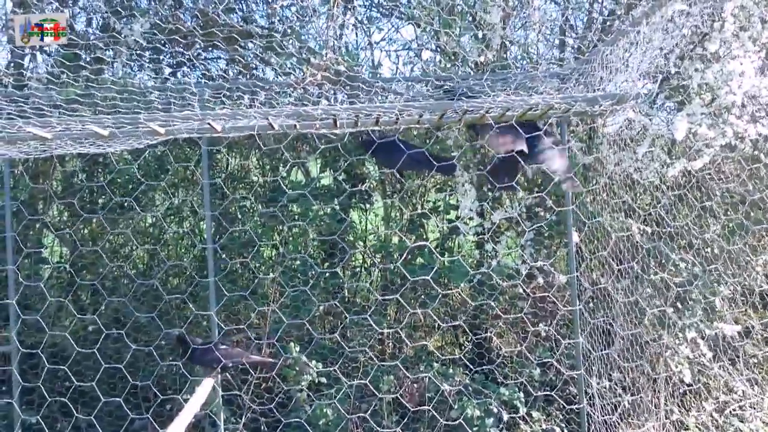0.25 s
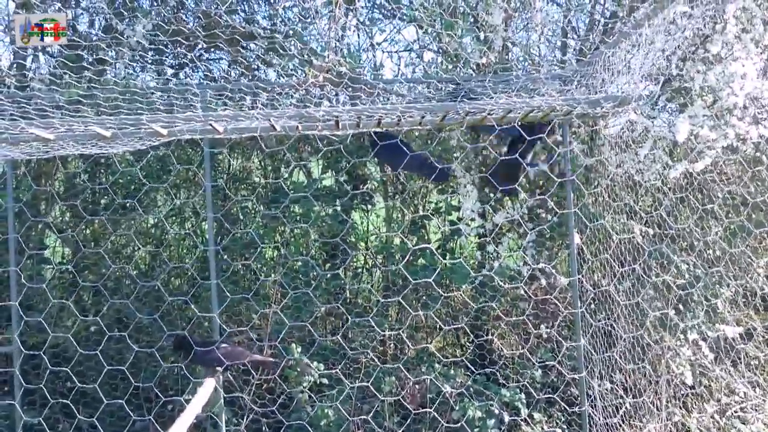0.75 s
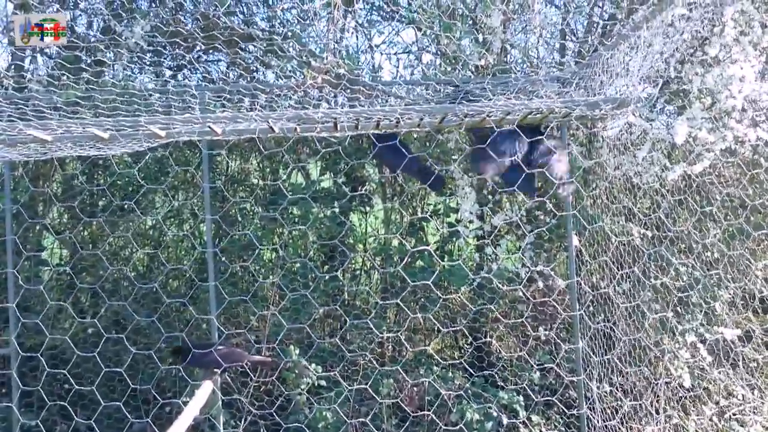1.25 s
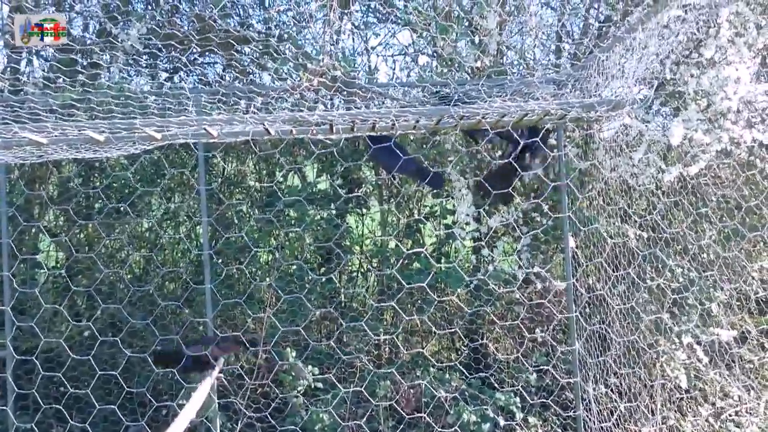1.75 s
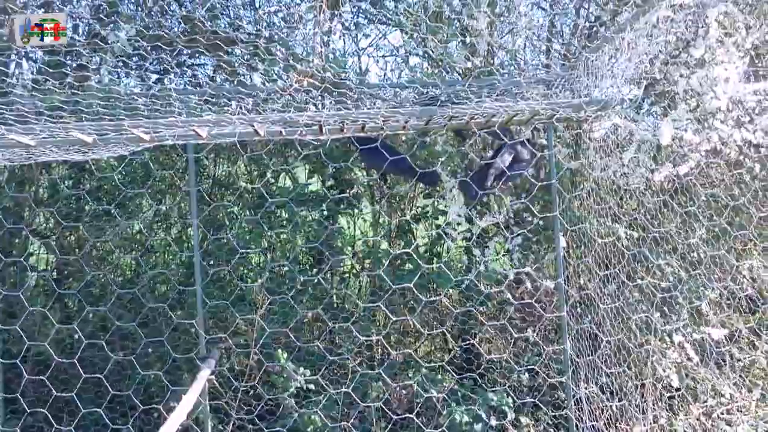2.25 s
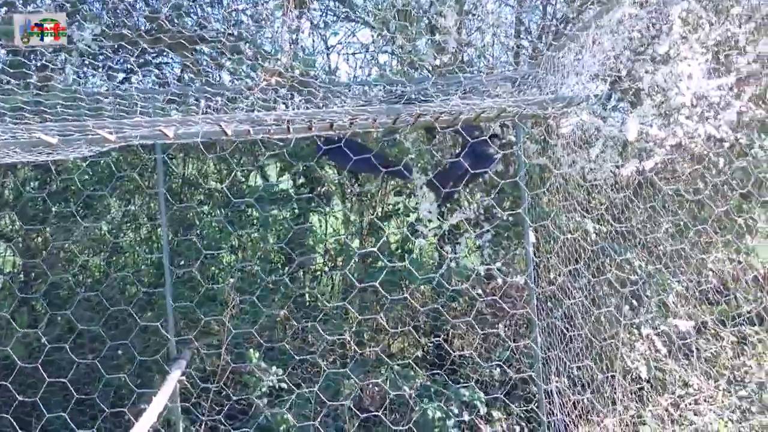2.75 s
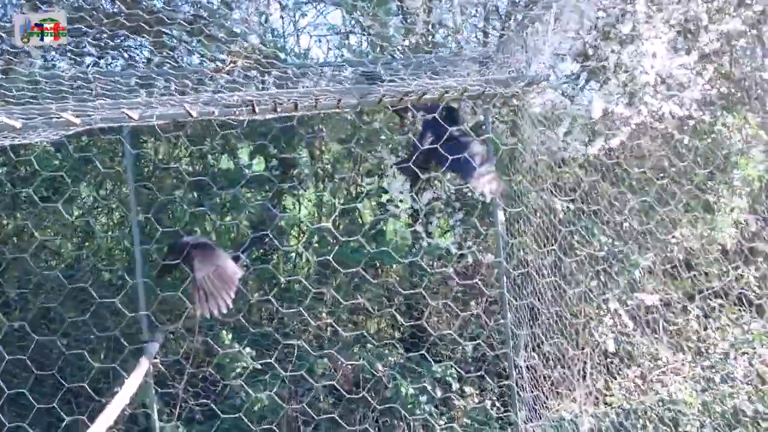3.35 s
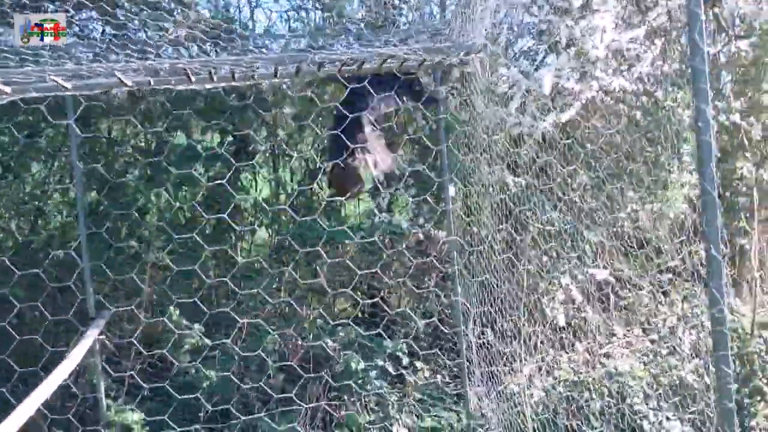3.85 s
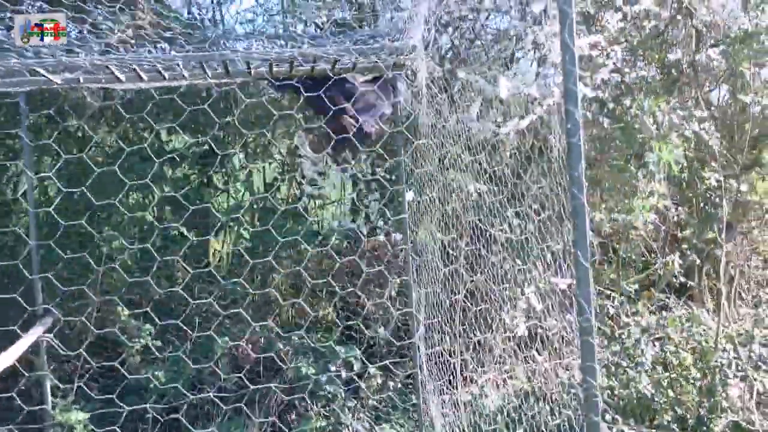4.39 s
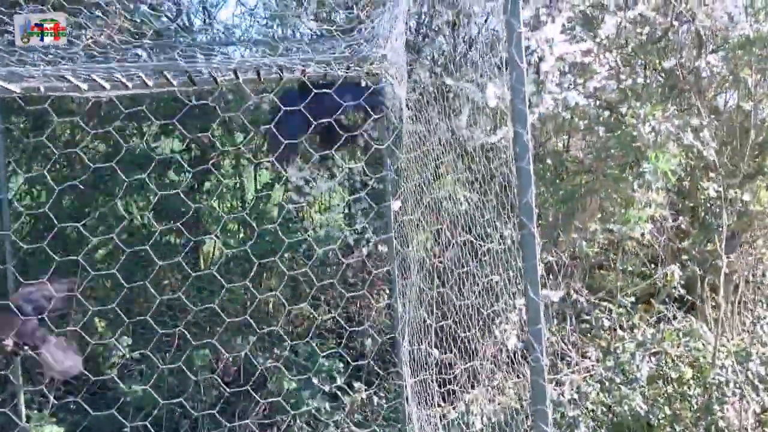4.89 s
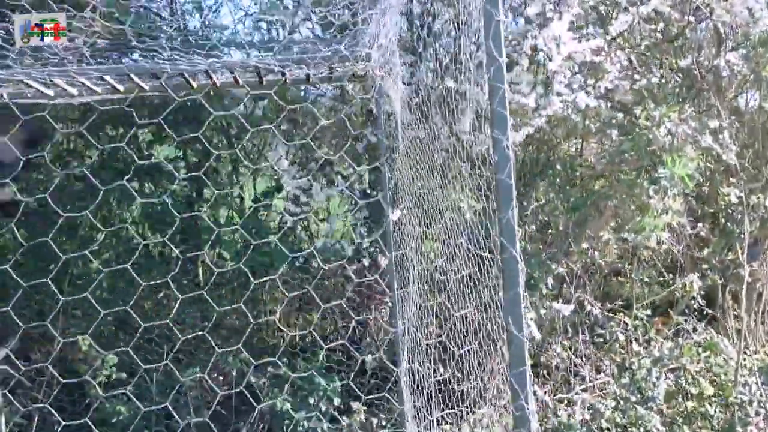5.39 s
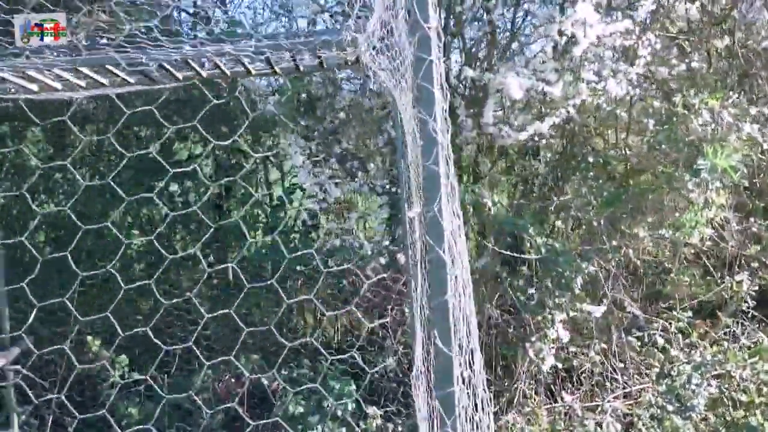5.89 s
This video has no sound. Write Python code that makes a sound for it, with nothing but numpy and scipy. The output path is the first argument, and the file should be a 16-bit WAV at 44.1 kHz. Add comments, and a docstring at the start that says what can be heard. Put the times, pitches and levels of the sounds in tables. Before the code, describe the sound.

Crows flap against a wire mesh cage, wings swishing and wire rattling, growing louder as dry undergrowth crackles outdoors.

```python
"""Crows in a wire-mesh trap

Crows flutter against the netting beside a hedge, far off at first, then louder. Wings swish and slap
the mesh, claws tick and scrape on the wire, and dry undergrowth crackles in the second half.
Light wind puffs on a hand-held recorder whose two microphone ports each have their own colour."""
import sys
import numpy as np
from scipy import signal
from scipy.fft import rfft, irfft
from scipy.io import wavfile
from scipy.ndimage import uniform_filter1d

SR = 44100
rng = np.random.default_rng(int(sys.argv[2]) if len(sys.argv) > 2 else 0)


def pcm_store(signal):
    """Save signal as 16-bit PCM."""
    levels = np.round(np.clip(np.atleast_2d(signal), -1, 1) * 32767)
    wavfile.write(sys.argv[1], SR, levels.astype(np.int16).T)


N = 270333
T = np.arange(N) / SR
PORT_LAG_S = .00043   # travel time of sound from one port to the other
USUAL_T60_S = 0.022   # decay of a typical rattle of the mesh

# bright EQ of feathers and chattering wire: f/Hz, level/dB
BRIGHT_EQ = [(300, -26.5), (1000, -16.5), (2000, -3.5), (3200, -1.5), (6500, 0), (10000, -1), (15000, 1)]
# dull EQ of pushed air and body thuds: f/Hz, level/dB
DULL_EQ = [(40, -8), (120, -15.5), (200, -9), (320, -2), (500, -6.5), (800, 6), (1200, 4), (2000, -2.5),
           (3500, -15), (9000, -52.5)]


def wings(usual_hiss_db=-36, air_offset_db=-10.5, air_db_per_db=0.92):
    """Each stroke pushes air and drags stiff feathers over one another and over the mesh."""
    # wing strokes and their feather hiss: t/s, length/s, level/dB
    strokes = [(-.03, 0.045, -45.5), (0.147, 0.053, -48.5), (0.343, 0.055, -48), (0.575, 0.024, -53),
               (.748, 0.056, -50.5), (0.913, 0.079, -44.5), (1.103, 0.067, -45), (1.246, 0.074, -50),
               (1.294, 0.093, -44), (1.541, 0.059, -50.5), (1.7, .11, -53.5), (1.915, 0.13, -60),
               (1.976, 0.081, -49), (2.155, 0.093, -50), (3.397, 0.041, -53.5), (3.455, 0.054, -43),
               (3.619, 0.05, -38.5), (3.744, 0.069, -31), (3.935, 0.036, -36), (4.27, 0.071, -39),
               (4.444, 0.032, -35), (4.546, 0.092, -45.5), (4.694, 0.087, -30.5), (4.798, 0.027, -35.5),
               (4.865, 0.048, -36), (4.944, 0.04, -40.5), (5.099, 0.062, -44.5), (5.286, 0.046, -34.5),
               (5.398, 0.055, -36.5), (5.521, 0.073, -38.5), (5.716, .12, -41.5), (5.928, 0.014, -47),
               (6.015, 0.067, -45)]
    hiss, air = np.zeros(N), np.zeros(N)
    for start, length, hiss_db in strokes:
        stroke = swell(start, length, fullness=0.66)
        hiss += from_db(hiss_db) * stroke
        air += from_db(usual_hiss_db + air_offset_db + air_db_per_db * (hiss_db - usual_hiss_db)) * stroke
    flutter = from_db(0.41 * drift(110))   # feathers flick past one by one
    feathers = hiss * rms_one(colour(grains(per_s=3500, spread_db=5.0, smooth=0.62), BRIGHT_EQ))
    push = air * rms_one(colour(grains(per_s=1900, spread_db=2.5, smooth=0.82), DULL_EQ))
    return surroundings(flutter * (feathers + push), scatter_db=6, t60=0.059)


def mesh_strikes(crack_db=11.5, thud_db=-6, thud_db_per_doubling=8.5):
    """A blow cracks, then the loose wire twists chatter briefly over a dull thud."""
    # wings and feet hitting the mesh: t/s, level/dB, rattle t60/s
    blows = [(.077, -54, 0.023), (.157, -51, 0.018), (.471, -51.5, 0.038), (.757, -48, 0.016),
             (.9256, -40.5, 0.027), (1.053, -46.5, 0.031), (1.345, -41, 0.024), (1.371, -35, 0.019),
             (1.566, -47.5, 0.046), (1.793, -46.5, 0.035), (2.173, -45, 0.046), (2.221, -42.5, 0.033),
             (2.524, -46.5, 0.033), (2.629, -48.5, 0.037), (3.46, -50, 0.063), (3.483, -44, 0.0062),
             (3.603, -43, 0.067), (3.755, -26, 0.032), (3.765, -27.5, 0.019), (3.878, -47, 0.052),
             (3.95, -30, 0.012), (4.082, -33.5, 0.015), (4.177, -32, 0.018), (4.299, -32, 0.037),
             (4.398, -33.5, 0.022), (4.725, -24, 0.026), (4.754, -22.5, 0.019), (4.862, -33.5, 0.024),
             (4.947, -42, 0.028), (5.249, -36, 0.032), (5.2947, -16, 0.012), (5.3485, -28, .015),
             (5.379, -23.5, 0.015), (5.383, -19.5, 0.0081), (5.488, -42.5, 0.04), (5.533, -37.5, 0.038),
             (5.607, -29, 0.029), (5.674, -33, 0.032), (5.72, -33, 0.027)]
    rattle, thud, cracks = np.zeros(N), np.zeros(N), np.zeros(N)
    for start, level_db, t60 in list(blows) + footholds():
        at = int(start * SR)
        age = T[:min(N - at, SR // 4)]
        decay = from_db(level_db - 60 * age / t60)
        # a claw gives a short bright hit, a body a longer, duller one
        weight = from_db(thud_db + thud_db_per_doubling * np.log2(t60 / USUAL_T60_S))
        rattle[at:at + len(age)] += decay
        thud[at:at + len(age)] += decay * weight
        cracks[at] = from_db(level_db + crack_db)
    wire = rattle * rms_one(colour(grains(per_s=5100, spread_db=0.5, smooth=0.42), BRIGHT_EQ))
    body = thud * rms_one(colour(grains(per_s=4400, spread_db=0.5, smooth=1.0), DULL_EQ))
    return surroundings(colour(cracks, BRIGHT_EQ) + wire + body, scatter_db=-2, t60=0.15)


def footholds(per_s=4, above_rustle_db=10, spread_db=3):
    """Feet touch the wire at random, louder when the scuffle is: rows of t/s, level/dB, t60/s."""
    times = T[rng.random(N) < per_s / SR]
    levels = rustle_db(times) + above_rustle_db + spread_db * rng.standard_normal(len(times))
    return [(start, db, USUAL_T60_S) for start, db in zip(times, levels)]


def knocks():
    """Single taps, each with one quickly damped resonance; the soft contact gives little above it."""
    # small close knocks: t/s, level/dB, f/Hz, t60/s, left over right/dB
    taps = [(.6485, -27, 7100, 0.00032, 12), (.649, -41.5, 1100, 0.0061, 7), (3.462, -49, 335, 0.026, -6),
            (3.603, -31, 990, 0.014, 3), (3.878, -39.5, 334, 0.0068, -10), (4.172, -41.5, 422, 0.029, -2),
            (4.21, -41.5, 1140, 0.021, -5), (4.728, -32, 925, 0.043, 1), (4.754, -31, 960, .025, -5),
            (5.02, -27, 1374, 0.037, -2), (5.0238, -30, 1700, 0.013, -3), (5.026, -35.5, 1100, 0.041, -3),
            (5.055, -32, 1170, 0.0088, -3), (5.07, -25, 2100, 0.0067, -7.5), (5.2945, -25, 1000, 0.017, 8),
            (5.113, -48.5, 310, 0.053, -4), (5.605, -35, 423, .04, 1)]
    out, click = np.zeros((2, N)), signal.unit_impulse(SR // 10)
    for start, level_db, hz, t60, pan_db in taps:
        at = int(start * SR)
        contact = signal.sosfilt(signal.butter(4, min(1.7 * hz, .4 * SR), fs=SR, output="sos"), click)
        out[:, at:at + len(contact)] += from_db(level_db) * pan(pan_db) * ring(contact, hz, t60)
    return np.array([out[0], np.roll(out[1], round(PORT_LAG_S * SR))])


def claws():
    """A claw sticks and slips along a wire, which answers with a thin rasping note."""
    # skids on the wire: t/s, length/s, level/dB, f/Hz
    skids = [(1.715, 0.026, -50, 5400), (1.739, 0.0057, -40, 5090), (1.75, 0.022, -66, 5200),
             (2.319, .02, -63.5, 8170), (3.158, .025, -56, 10600), (5.408, 0.018, -42.5, 6340),
             (5.773, 0.076, -46.5, 5400)]
    slips = grains(per_s=2500, spread_db=2, smooth=.5)
    rasp = sum(from_db(db) * swell(start, length) * rms_one(ring(slips, hz, t60=.007))
               for start, length, db, hz in skids)
    return surroundings(rasp, scatter_db=-4, t60=0.1)


def undergrowth(stems_db=-5.5, clump_db=2):
    """Dry leaves crackle in clumps while thicker stems crunch lower down."""
    # crisp EQ of the leaves: f/Hz, level/dB
    leaf_eq = [(300, -40), (1000, -2.5), (2000, -3.5), (3200, -1.5), (6500, 0.5), (10000, -3.5),
               (15000, -3.5)]
    # darker EQ of the stems: f/Hz, level/dB
    stem_eq = [(40, -3), (150, -10), (320, -6.5), (500, -4.5), (800, -1.5), (1200, -0.5), (2000, -3),
               (3500, -27), (9000, -24)]
    leaf_snaps = grains(per_s=4200, spread_db=1.5, smooth=0.97) * from_db(1.83 * drift(62))
    stem_snaps = grains(per_s=900, spread_db=3.5, smooth=0.87) * from_db(2.6 * drift(23))
    leaves = rms_one(colour(leaf_snaps, leaf_eq))
    stems = from_db(stems_db) * rms_one(colour(stem_snaps, stem_eq))
    level = from_db(rustle_db(T) + clump_db * drift(rate_hz=4))
    return surroundings(level * (leaves + stems), scatter_db=6.5, t60=0.084)


def rustle_db(times, loudest_db=-42, db_per_stir_db=1.41):
    """Level of the leaves at the given times; it follows how hard they are stirred."""
    # how hard the undergrowth is stirred: t/s, level/dB
    stir = [(0.0, -65), (0.77, -69.5), (1.3, -65.5), (3.0, -71.5), (3.21, -69.5), (3.46, -62),
            (3.58, -57.5), (3.86, -57.5), (4.23, -55), (4.66, -56.5), (4.83, -51), (4.93, -54),
            (5.09, -55.5), (5.24, -57), (5.48, -55.5), (5.62, -55), (5.84, -59.5), (6.13, -55.5)]
    stir_times, stir_db = np.transpose(stir)
    return loudest_db + db_per_stir_db * (np.interp(times, stir_times, stir_db) - stir_db.max())


def wind(breeze_db=-68, gust_db=2.5):
    """Eddies buffet each port on its own, mostly the right; a puff is a few slow swings of pressure."""
    # puffs above the breeze: t/s, length/s, level/dB
    puff_cues = [(.152, .07, -61), (0.512, 0.12, -51.5), (1.39, .1, -52.5), (1.87, 0.072, -49.5),
                 (2.128, 0.025, -52), (2.443, 0.04, -54), (2.604, 0.05, -57), (2.901, .038, -47),
                 (3.868, 0.033, -47.5), (4.935, 0.13, -52.5), (5.301, 0.055, -55)]
    # low rumble of the eddies: f/Hz, level/dB
    rumble_eq = [(20, -39), (40, -5.5), (62, 2), (90, -3.5), (130, -13), (220, -27), (600, -62)]
    breeze = from_db(breeze_db + gust_db * drift(rate_hz=9.9))
    puffs = sum(from_db(db) * swell(start, length, fullness=1.8) for start, length, db in puff_cues)
    eddies = colour(rng.standard_normal((2, N)), rumble_eq)
    eddies /= np.sqrt(uniform_filter1d(eddies ** 2, size=1200, axis=1) + 1e-20)   # even out the level
    return (breeze + puffs) * eddies * from_db([[-15], [-1]])


def open_country(level_db=-61.5, pan_db=7, directions=8):
    """The hush of open country arrives from all directions, stronger on the left."""
    # EQ of the ambience bed: f/Hz, level/dB
    hush_eq = [(30, -8), (80, 2), (250, 3.5), (600, 8.5), (1000, 7.5), (2000, 1), (4000, -5), (7000, -10.5),
               (10000, -22.5), (15000, -3)]
    left, right = np.zeros(N), np.zeros(N)
    for lag in np.linspace(-1, 1, directions) * PORT_LAG_S:
        far = rng.standard_normal(N)
        left += far
        right += np.roll(far, round(lag * SR))
    return from_db(level_db) * pan(pan_db) * rms_one(colour(np.array([left, right]), hush_eq))


def surroundings(x, scatter_db, t60, count=90, size=1024):
    """Direct sound reaches the left port first; ground and hedge scatter echoes from all sides."""
    # where the birds lie as the recorder swings right: t/s, bearing (0 = ahead, 1 = hard left)
    bearing = [(0, 0.054), (3.2, 0.17), (3.9, 0.62), (4.7, 0.98), (5.4, 1.05), (6.13, 0.97)]
    # each scrap of sound comes from a spot of its own, so the echo pattern keeps changing
    span, starts = 3 * size, np.arange(0, N + size, size // 2)
    scraps = np.pad(x, (size, 2 * size))[starts[:, None] + np.arange(size)] * signal.windows.cosine(size)
    shape = (len(starts), count)
    delay = .0008 + .04 * rng.random(shape) ** 2
    gains = from_db(-40 * delay / t60) * rng.choice([-1, 1], shape)
    gains /= np.linalg.norm(gains, axis=1, keepdims=True)
    lag = rng.uniform(-.6, 1, shape) * PORT_LAG_S
    patterns = np.zeros((2, len(starts), span), np.float32)
    for port, arrival in enumerate((delay, delay + lag)):
        np.add.at(patterns[port], (np.arange(len(starts))[:, None], (arrival * SR).astype(int)), gains)
    scattered = irfft(rfft(patterns) * rfft(scraps.astype(np.float32), span))
    echoes = np.zeros((2, N + size + span))
    for k, at in enumerate(starts):
        echoes[:, at:at + span] += scattered[:, k]
    left_lead = np.interp(T, *np.transpose(bearing)) * PORT_LAG_S * SR
    direct = np.array([x, x[np.clip(np.arange(N) - left_lead.astype(int), 0, N - 1)]])
    wet = from_db(scatter_db)
    return (direct + wet * echoes[:, size:size + N]) / np.sqrt(1 + wet ** 2)


def grains(per_s, spread_db, smooth):
    """Random tiny snaps of uneven size on a bed of smooth friction."""
    sizes = from_db(spread_db * np.minimum(rng.exponential(1, N), 4.5)) * rng.choice([-1, 1], N)
    snaps = rms_one(sizes * (rng.random(N) < per_s / SR))
    return rms_one(snaps + smooth * rng.standard_normal(N))


def ring(x, hz, t60):
    """A damped resonance that passes no bass."""
    radius, angle = from_db(-60 / (t60 * SR)), 2 * np.pi * hz / SR
    return signal.lfilter([.5, 0, -.5], [1, -2 * radius * np.cos(angle), radius * radius], x + 1e-18)


def swell(start, length, fullness=1.0):
    """One rounded rise and fall; a higher exponent narrows it."""
    out = np.zeros(N)
    inside = (T > start) & (T < start + length)
    out[inside] = np.abs(np.sin(np.pi * (T[inside] - start) / length)) ** fullness
    return out


def drift(rate_hz):
    """Smooth random modulation of unit power."""
    pole = np.exp(-2 * np.pi * rate_hz / SR)
    return rms_one(signal.lfilter([1], [1, -2 * pole, pole * pole], rng.standard_normal(N + SR))[SR:])


def colour(x, eq, size=4096):
    """Minimum-phase EQ through points of f/Hz, level/dB."""
    hz, db = np.transpose(eq)
    grid = np.maximum(np.fft.rfftfreq(size, 1 / SR), 1)
    gains = from_db(np.interp(np.log(grid), np.log(hz), db))
    cepstrum = irfft(np.log(gains))
    cepstrum[1:size // 2] *= 2
    cepstrum[size // 2 + 1:] = 0
    response = irfft(np.exp(rfft(cepstrum)))
    return signal.fftconvolve(x, response if x.ndim == 1 else response[None], axes=-1)[..., :N]


def pan(db):
    """Left and right gains for a level difference."""
    return from_db([[db / 2], [-db / 2]])


def from_db(db):
    """Decibels to gain."""
    return 10 ** (np.asarray(db) / 20)


def rms_one(x):
    """Scale to unit power."""
    return x / np.sqrt(np.mean(x ** 2) + 1e-20)


def scene():
    """Birds, cage and undergrowth over a bed of open air."""
    return wings() + mesh_strikes() + knocks() + claws() + undergrowth() + open_country() + wind()


def record(dry, hiss_db=-73, cutoff_hz=16000):
    """The two ports have their own resonances and opposite polarity; faint hiss; the top is cut."""
    # colour of the left port: f/Hz, level/dB
    left_eq = [(100, -2.5), (320, -3), (480, -4), (700, -7), (1300, -8), (3300, -3), (4700, -5.5),
               (6200, 4), (8000, 2.5), (9700, 2), (11000, -9.5), (15500, -17.5)]
    # colour of the right port: f/Hz, level/dB
    right_eq = [(100, -4), (320, 4), (900, 0), (1400, 0.5), (2300, 3), (3000, 7), (3900, 6.5), (4700, -1.5),
                (7000, -4.5), (9000, -6), (11000, -11.5), (15500, -12)]
    ports = np.array([colour(dry[0], left_eq), -colour(dry[1], right_eq)])
    hiss = from_db(hiss_db) * rng.standard_normal((2, N))
    return signal.sosfilt(signal.ellip(10, .1, 70, cutoff_hz, fs=SR, output="sos"), ports + hiss)


dry = scene()
out = record(dry)
pcm_store(out)
```